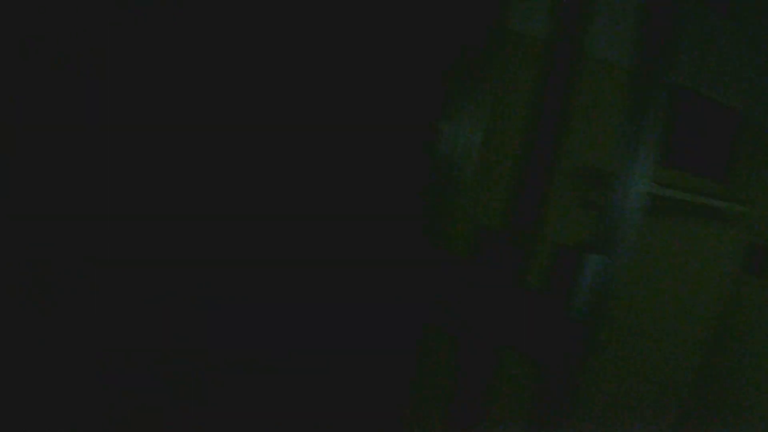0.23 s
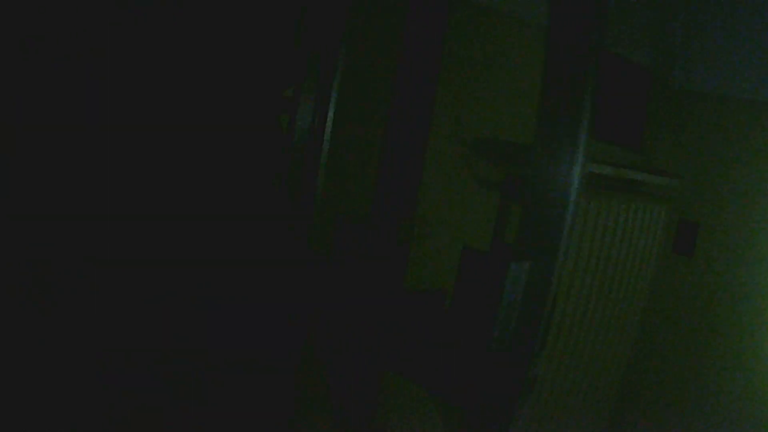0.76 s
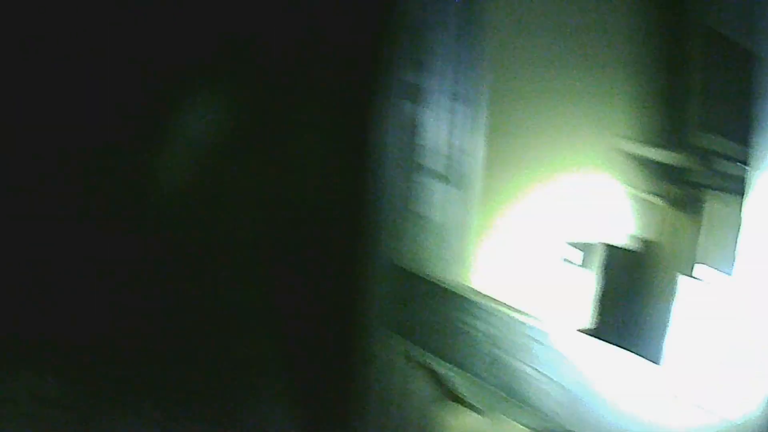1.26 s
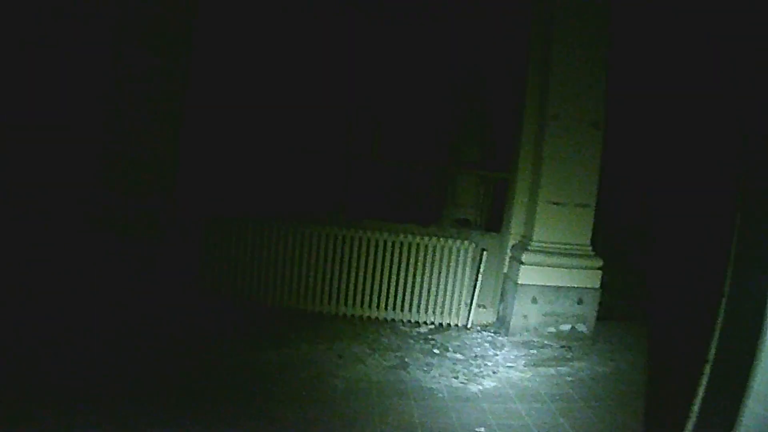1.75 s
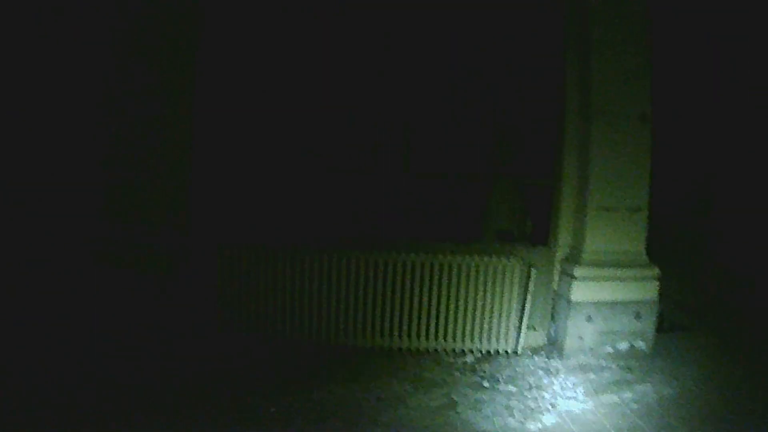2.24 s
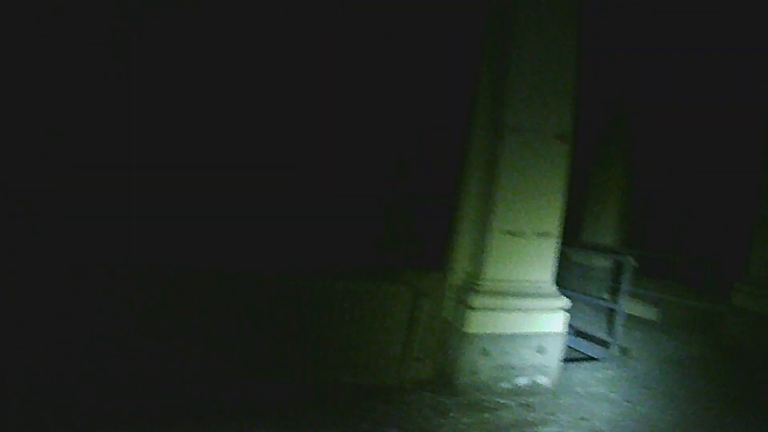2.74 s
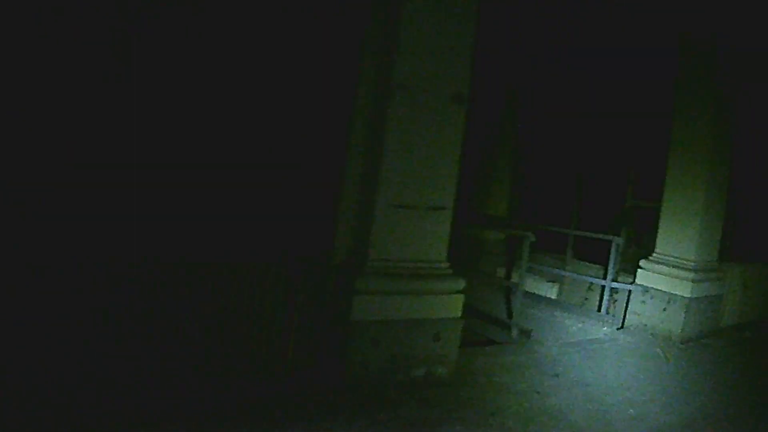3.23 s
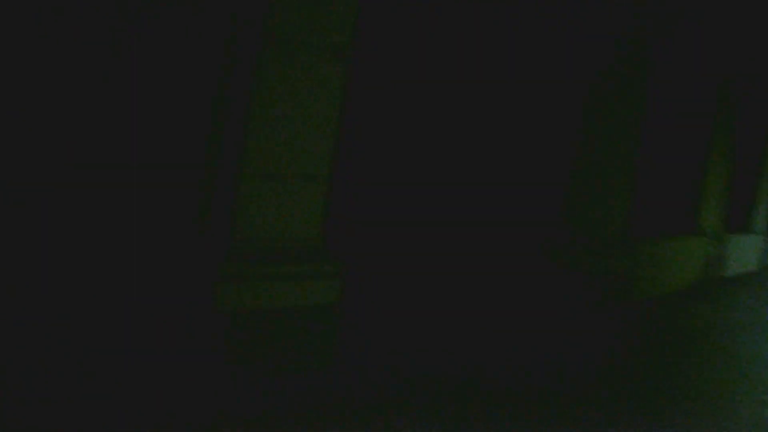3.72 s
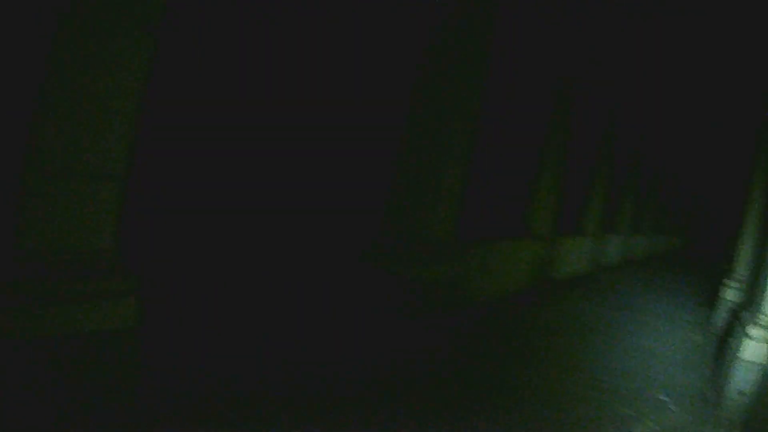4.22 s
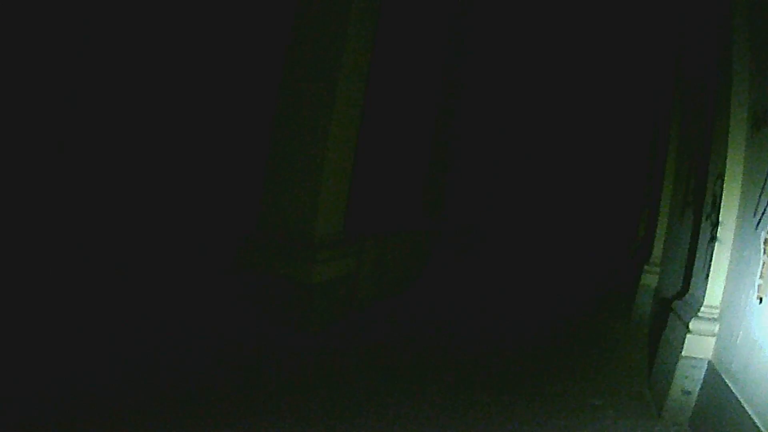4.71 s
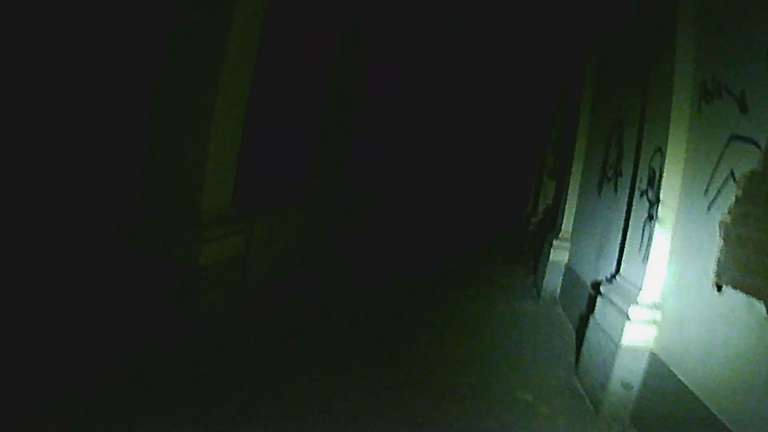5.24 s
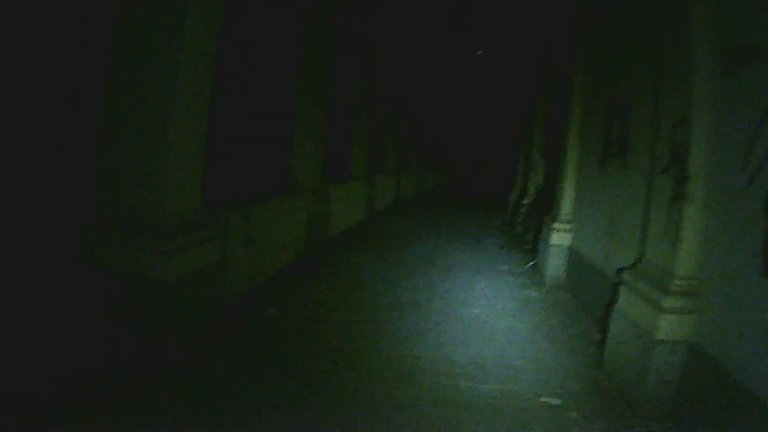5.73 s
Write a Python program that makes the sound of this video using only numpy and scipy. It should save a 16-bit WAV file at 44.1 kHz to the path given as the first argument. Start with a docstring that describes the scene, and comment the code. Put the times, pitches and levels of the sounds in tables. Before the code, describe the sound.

Close, handheld pickup of a careful walk through a dark, bare building. Fragments break underfoot with dry, ceramic clacks, coarse grains grind beneath soles and low heel thumps land softly. A loud bright break comes about two seconds in, followed by dense crackling. After four seconds the steps quieten into fine grit and small shard squeaks, with a very faint high pulsing whine. The hall rings after each step over hiss and rumble.

```python
"""Footsteps over broken tile and plaster in a large, empty stone hall, with air hiss and an uneven rumble.
From the start, struck resonances snap as fragments break, clumped grains grind and shoes thump.
Shards squeal in wavering tones from 0.4 s; decaying sine modes colour the loud break at 2.1 s.
A thin whine of two gated tones pulses from 4.3 to 5.1 s, and the grit turns finer at 4.6 s.
Decaying noise bands make the hall ring for about a second after the steps, snaps, grit and shards."""
import sys
import numpy as np
from scipy import signal
from scipy.fft import rfft, irfft, next_fast_len
from scipy.io import wavfile
from scipy.ndimage import uniform_filter1d

SR = 44100
rng = np.random.default_rng(int(sys.argv[2]) if len(sys.argv) > 2 else 0)


def persist_wave(psi):
    """Save psi, clipped to +-1, as 16-bit WAV."""
    counts = np.round(np.clip(psi, -1, 1) * 32767).astype(np.int16)
    wavfile.write(sys.argv[1], SR, np.atleast_2d(counts).T)


N = 263277
TIME = np.arange(N) / SR

# The clearest snaps: breaking fragments and, after the snap at 1.36 s, likely wall echoes.
# Level is nominal, treble is relative to the body.
# Columns: start_s, level_db, treble_db, body_hz, edge_hz
CLEAR_SNAPS = [(.001, -32.5, -6.5, 1120, 3160), (.0832, -36.5, -27, 1520, 3380),
               (.355, -35.5, -7.5, 1000, 3400), (.3933, -35, -23, 1570, 4050),
               (.5832, -28, -30, 1360, 2530), (.5917, -32.5, -35, 1360, 2530),
               (.6193, -20.5, -35, 1400, 2730), (.691, -37, 3, 1600, 3700), (1.091, -47, 4, 1480, 3520),
               (1.2688, -50, 9, 1400, 3730), (1.357, -21, -2, 1290, 3630), (1.4832, -38.5, 5, 1530, 2250),
               (1.5658, -38.5, -32, 1490, 2680), (2.093, -25.5, 20, 1070, 3200),
               (2.1094, -21, 1, 1100, 2170), (2.161, -34, -6, 1620, 2380), (2.6433, -39.5, -28, 1380, 4520),
               (2.6762, -41.5, -12, 1510, 3747), (2.7182, -30, -13, 1100, 3420),
               (2.721, -34, 3, 1430, 3700), (2.725, -38, -15, 1100, 3980), (2.783, -37, -5, 1450, 4190),
               (2.812, -35, -18, 1550, 2940), (2.851, -27, -7.5, 1500, 3600), (3.101, -44, 14, 1380, 3600),
               (3.177, -38, -3, 950, 3750), (3.2902, -33.5, -8, 1410, 2400), (3.3467, -30, -5, 1190, 3300),
               (3.3688, -34, 24, 1270, 3800), (3.3923, -36.5, -20, 1220, 3820),
               (3.5223, -38, -6, 1150, 3200), (3.5774, -41.5, -29, 1550, 3000),
               (3.6002, -41, -9, 1350, 3060), (3.7729, -39.5, -30, 1460, 2360),
               (3.8076, -37.5, -17, 1340, 2920), (3.8562, -35.5, -10.5, 1290, 2880),
               (3.8758, -40, -27, 1320, 3140), (3.9203, -30.5, -21, 1520, 2520),
               (3.9329, -36.5, -6, 1240, 3550), (4.0137, -41, 17, 1320, 3430), (4.023, -32, -8, 1490, 3700),
               (4.3431, -46.5, -12, 1660, 3550), (4.5181, -49, -4, 1300, 4260),
               (5.6234, -47.5, -14, 1590, 2590)]
# Splintering relative to the first break [dB]; brighter breaks splinter more [dB per dB of treble].
SPLINTER_DB, SPLINTER_PER_TREBLE = -3, 0.17

# Random faint snaps around each step, mostly shortly after it: count, mean delay and its spread [s].
CRUMBS_PER_STEP, CRUMB_LAG_S, CRUMB_SPREAD_S = 4, 0.08, 0.09
# Mean level, treble and resonances, then the spread of each.
CRUMB_DB, CRUMB_TREBLE_DB, CRUMB_HZ, CRUMB_EDGE_HZ = -52.5, -13, 1440, 3100
CRUMB_SPREAD_DB, CRUMB_TREBLE_SPREAD_DB, CRUMB_SPREAD_OCT = 6.5, 5.5, 0.13

# A sole grinding grit; level holds before the pressure curve, whose sides have 1/e times rise and fall.
# Columns: peak_s, rise_s, fall_s, level_db, tilt_db_per_octave
GRINDING_SOLES = [(.004, .013, 0.1, -43.5, -1.5), (.37, 0.016, 0.36, -55.5, 0),
                  (0.59, .018, 0.023, -37, -3), (.645, .032, 0.075, -42.5, -3),
                  (2.094, 0.0059, 0.0068, -32, -2), (2.117, .006, .02, -31.5, 0),
                  (2.551, 0.034, 0.35, -57.5, -.5), (2.724, 0.0095, 0.015, -32, -2),
                  (2.787, .0038, 0.0051, -35.5, 4), (2.835, .022, 0.02, -40, 1.5),
                  (3.348, 0.024, 0.022, -39.5, 2), (3.44, 0.023, .053, -48.5, 0.5),
                  (3.933, .05, 0.11, -49.5, -3), (4.03, 0.029, 0.074, -48, 0), (4.36, .019, 0.05, -58, -1),
                  (4.53, 0.043, 0.13, -59.5, -1), (4.65, 0.023, 0.18, -52, -5),
                  (5.07, 0.026, 0.082, -45.5, 2), (5.16, .069, 0.2, -51, 0),
                  (5.34, 0.023, 0.062, -52, -1.5), (5.743, 0.045, 0.079, -57, 0),
                  (5.891, 0.078, 0.041, -57.5, 5.5)]
# Ring of grit pinned under a sole, relative spectrum before tilt. Columns: pitch_hz, level_db_per_hz
GRIT_SPECTRUM = [(350, -8.5), (600, -13), (900, -1.5), (1400, -1), (1750, -7.5), (2200, -6), (3000, -13),
                 (4100, -8), (5300, -20), (6900, -15), (8500, -27), (10000, -31), (12000, -25.5),
                 (14500, -40.5)]
# Coarse rubble gives way to fine dust further along the floor.
COARSE_GRAINS_PER_S, FINE_GRAINS_PER_S, DUST_FROM_S = 3000, 14000, 4.6

# The shoe's weight landing, nominal levels. Columns: start_s, heel_level_db, sole_level_db, sole_hz
FOOTFALLS = [(.002, -55, -46, 452), (.547, -47, -58, 500), (1.359, -49, -46.5, 510),
             (2.088, -45, -41.5, 493), (2.717, -46, -42.5, 790), (3.346, -49.5, -49, 380),
             (4.036, -58, -45.5, 666), (4.561, -55.5, -59, 785), (5.039, -45.5, -46, 476),
             (5.312, -61.5, -40.5, 786), (5.708, -56.5, -58, 590)]
HEEL_HZ, HEEL_FALL_S, SOLE_FALL_S = 142.4, 0.08, 0.045

# Shards skidding on tile, nominal levels; the swell peaks at a quarter of its time scale.
# Columns: start_s, time_scale_s, pitch_hz, level_db
SKIDDING_SHARDS = [(0.396, 0.025, 1910, -49), (0.688, 0.0037, 4380, -35), (0.72, 0.0051, 4620, -51),
                   (2.519, 0.016, 6060, -56), (3.539, 0.031, 12400, -68), (4.109, 0.026, 4590, -59),
                   (4.098, 0.018, 7270, -57.5), (4.09, 0.016, 6260, -55), (5.323, 0.14, 1229, -49.5),
                   (5.626, 0.075, 4500, -59.5), (5.633, 0.052, 5990, -60.5), (5.641, 0.02, 8760, -66),
                   (5.725, 0.012, 11250, -66), (5.822, 0.046, 2670, -53.5)]

BREAK_RING_S = 2.1094
# Short pitched ring that colours the loud break at 2.1 s. Columns: pitch_hz, t60_s, peak_level_db
BREAK_RING_MODES = [(1649, .06, -40), (2309, .07, -35), (2380, .05, -37), (2584, .04, -42),
                    (2984, .04, -42), (3481, .05, -43), (3893, .06, -45)]

# Reverberation of the hall; reflected over direct energy, before the level sent to the hall.
# Columns: centre_hz, t60_s, reflected_db
HALL_BANDS = [(79.5, 0.83, 5), (188, 0.91, 0), (610, 1.68, 0), (1060, 0.94, -3.5), (1446, 1.11, 1.5),
              (2000, 0.93, -1), (2800, 0.72, -0.5), (3980, 0.9, 0), (6500, 0.53, 0), (11900, 0.44, 5)]

# Uneven low rumble, before RUMBLE_GAIN_DB; the swell at 5.1 s belongs to a heel thump.
# Columns: time_s, level_db
RUMBLE_LEVEL = [(0.0, -51.5), (0.38, -60), (0.53, -52.5), (2.03, -63.5), (2.23, -50), (2.33, -62),
                (2.63, -43.5), (3.16, -58.5), (3.46, -47.5), (3.92, -57), (4.12, -45), (4.32, -62.5),
                (4.72, -51), (4.89, -70), (5.1, -42), (5.44, -64), (5.87, -47.5), (5.97, -53)]
# Relative spectrum of that rumble. Columns: frequency_hz, level_db_per_hz
RUMBLE_SPECTRUM = [(8, 0), (15, 2.5), (28, -0.5), (50, -11), (80, -26), (160, -50), (400, -68)]
RUMBLE_GAIN_DB = 5

# Relative spectrum of still air and microphone hiss. Columns: frequency_hz, level_db_per_hz
HISS_SPECTRUM = [(60, 3), (150, -1.5), (300, -7), (700, -13), (1400, -9), (3000, -17), (7000, -22),
                 (14500, -25.5)]
HISS_DB = -61
CUTOFF_HZ = 14700


def cracks(splinter_s=0.0031, body_width_hz=600, body_db=-1.5, edge_db=-0.98, thump_db=-14,
           fracture_hz=2700, fracture_db=-7, chip_hz=7000, chip_db=-11, dust_hz=11800, dust_db=-29):
    """Impulse response: a sharp break and a little splintering excite damped body and edge resonances."""
    out, t = np.zeros(N), TIME[:SR // 40]
    for start_s, level_db, treble_db, body_hz, edge_hz in list(CLEAR_SNAPS) + crumbs():
        splinter_db = SPLINTER_DB + SPLINTER_PER_TREBLE * treble_db
        splinter_swell = t / splinter_s * np.exp(-2 * t / splinter_s)
        splinters = rng.standard_normal(len(t)) * splinter_swell
        force = from_db(splinter_db) * splinters / np.linalg.norm(splinters)
        force[0] = 1  # the first break

        body = resonate(resonate(force, body_hz, body_width_hz), body_hz, 820)
        body += from_db(thump_db) * lowpass(resonate(force, 570, 640), 640)

        ring = resonate(resonate(force, edge_hz, edge_hz / 2), edge_hz, edge_hz)
        fracture = from_db(fracture_db) * resonate(resonate(force, fracture_hz, 1600), fracture_hz, 2300)
        chip = from_db(chip_db) * resonate(force, chip_hz, 1670)
        # neighbouring modes swing in opposite senses
        edge = lowpass(ring - fracture - chip, 6900)
        edge += from_db(dust_db) * resonate(force, dust_hz, 2300)
        # a gentle break is less sharp
        edge = lowpass(edge, np.interp(level_db, [-40, -22], [4500, 14000]))

        edge_share = 1 / (1 + from_db(-treble_db) ** 2)  # share of energy
        snap = from_db(body_db) * np.sqrt(1 - edge_share) * rms_one(body)
        snap += from_db(edge_db) * np.sqrt(edge_share) * rms_one(edge)
        # refer the energy to a nominal snap of 2.4 ms
        add(out, start_s, from_db(level_db) * snap * np.sqrt(0.0024 / t[-1]))
    return out


def crumbs():
    """Size scaling: faint snaps scattered around each step, where a smaller crumb rings higher."""
    steps_s = np.repeat(np.array(FOOTFALLS)[:, 0], int(round(CRUMBS_PER_STEP)))
    when, level, treble, smallness = rng.standard_normal((len(steps_s), 4)).T
    pitch = 2 ** (CRUMB_SPREAD_OCT * smallness)
    rows = np.transpose([
        steps_s + CRUMB_LAG_S + CRUMB_SPREAD_S * when,
        CRUMB_DB + CRUMB_SPREAD_DB * level,
        CRUMB_TREBLE_DB + CRUMB_TREBLE_SPREAD_DB * treble,
        CRUMB_HZ * pitch,
        CRUMB_EDGE_HZ * pitch,
    ])
    return [row for row in rows if 0 < row[0] < TIME[-1]]


def grit(size_db=2.5, relative_width=0.27, clump_db=3.0, count=26):
    """Granular friction: random grain bursts, clumped in level, each ring a brief resonance."""
    out, t = np.zeros(N), TIME[:SR // 2]
    pitches = np.geomspace(350, 14000, count)
    for peak_s, rise_s, fall_s, level_db, tilt_db in GRINDING_SOLES:
        grains_per_s = COARSE_GRAINS_PER_S if peak_s < DUST_FROM_S else FINE_GRAINS_PER_S
        start_s = max(0, peak_s - 2 * rise_s)
        from_peak = t + start_s - peak_s
        pressure = np.exp(-(from_peak / np.where(t + start_s < peak_s, rise_s, fall_s)) ** 2)
        clumps = from_db(clump_db * wander(len(t), SR // 250))
        tilt = tilt_db * np.log2(np.clip(pitches, 900, 6000))
        # the root turns level per Hz into level per resonance
        gains = from_db(at_hz(GRIT_SPECTRUM, pitches) + tilt) * np.sqrt(pitches)
        crunch = 0
        for hz, gain in zip(pitches, gains):
            sizes = from_db(size_db * np.minimum(rng.exponential(1, len(t)), 3))
            sizes = sizes * rng.choice([-1, 1], len(t))
            struck = rng.random(len(t)) < grains_per_s / count / SR
            bursts = sizes * clumps * struck
            width_hz = relative_width * np.sqrt(hz * 2000)
            crunch = crunch + gain * rms_one(resonate(resonate(bursts, hz, width_hz), hz, width_hz))
        add(out, start_s, from_db(level_db) * rms_one(crunch) * pressure)
    return out


def thuds(relative_width=1.19, rise_s=0.00064):
    """Damped impact: each step gives two short noise bursts, a low heel thump and a soft sole slap."""
    out, t = np.zeros(N), TIME[:SR // 3]
    for start_s, heel_db, sole_db, sole_hz in FOOTFALLS:
        for level_db, hz, fall_s in (heel_db, HEEL_HZ, HEEL_FALL_S), (sole_db, sole_hz, SOLE_FALL_S):
            width_hz = hz * relative_width
            push = resonate(resonate(rng.standard_normal(len(t)), hz, width_hz), hz, width_hz)
            swell = (1 - np.exp(-t / rise_s)) * np.exp(-t / fall_s)
            add(out, start_s, from_db(level_db) * rms_one(push * swell) * np.std(swell))
    return out


def squeals(jitter=0.029, sag_per_s=0.068, rough_db=6):
    """Stick-slip friction: a dragged shard sings a wavering, rough tone that sinks a little in pitch."""
    out, t = np.zeros(N), TIME[:SR // 4]
    for start_s, time_scale_s, hz, level_db in SKIDDING_SHARDS:
        pitch_hz = hz * (1 - sag_per_s * t + jitter * wander(len(t), SR // 500))
        roughness = from_db(rough_db * wander(len(t), SR // 150))
        tone = np.sin(2 * np.pi * np.cumsum(pitch_hz) / SR) * roughness
        swell = np.sqrt(t / time_scale_s) * np.exp(1 - 2 * t / time_scale_s)
        add(out, start_s, from_db(level_db) * rms_one(tone * swell) * np.sqrt(np.mean(swell ** 2)))
    return out


def break_ring():
    """Modal decay: exponentially decaying sine modes give the loud break a short pitched ring."""
    out, t = np.zeros(N), TIME[:SR // 3]
    for hz, t60_s, level_db in BREAK_RING_MODES:
        decay = np.exp(-np.log(1000) * t / t60_s)
        mode = np.sin(2 * np.pi * (hz * t + rng.random()))
        add(out, BREAK_RING_S, from_db(level_db) * decay * mode)
    return out


def hall(x, build_s=0.0057, early_db=3, early_s=0.041, lumpy_db=0.5):
    """Reverberation: convolution with noise that builds quickly, then decays at its own rate in each band."""
    t = TIME[:2 * SR]
    hz = np.fft.rfftfreq(len(t), 1 / SR)
    lumps = from_db(lumpy_db * rng.standard_normal(len(t)))
    reflections = rfft(rng.standard_normal(len(t)) * lumps)
    # near walls answer first, a little stronger
    onset = (1 - np.exp(-(t / build_s) ** 2)) * from_db(early_db * np.exp(-t / early_s))
    response = np.zeros(len(t))
    for centre_hz in 62.5 * 2 ** np.arange(0, 8.6, 0.5):
        # triangular bands half an octave apart
        band = np.maximum(0, 1 - 2 * np.abs(np.log2((hz + 1e-9) / centre_hz)))
        decay = onset * from_db(-60 * t / at_hz(HALL_BANDS, centre_hz))
        decay *= from_db(at_hz(HALL_BANDS, centre_hz, axis=2)) / np.sqrt(np.sum(decay ** 2))
        response += irfft(reflections * band) * decay
    return signal.fftconvolve(x, response / np.std(irfft(reflections)))[:N]


def whine(pitch_hz=7800, upper_hz=9109, level_db=-77, upper_db=-7):
    """Amplitude gating: two faint, high sine tones pulse on and off with softened edges."""
    start_s, end_s, period_s = 4.31, 5.06, 0.0688
    first_half = (TIME - start_s) / period_s % 1 < 0.5
    on = (TIME > start_s) & (TIME < end_s) & first_half
    tone = np.sin(2 * np.pi * pitch_hz * TIME)
    tone += from_db(upper_db) * np.sin(2 * np.pi * upper_hz * TIME)
    # the root of two brings the lower tone to rms 1
    return from_db(level_db) * np.sqrt(2) * tone * uniform_filter1d(on * 1.0, SR // 150)


def uneven_rumble():
    """Amplitude modulation: low noise swells and sinks along a level curve."""
    level_db = np.interp(TIME, *np.transpose(RUMBLE_LEVEL))
    return from_db(level_db + RUMBLE_GAIN_DB) * coloured_noise(RUMBLE_SPECTRUM)


def air_hiss():
    """Stationary random noise: still air and microphone hiss share one steady spectrum."""
    return from_db(HISS_DB) * coloured_noise(HISS_SPECTRUM)


def from_db(db):
    """Decibel law: level to amplitude ratio."""
    return 10 ** (np.asarray(db) / 20)


def rms_one(x):
    """Normalisation to unit rms."""
    return x / np.sqrt(np.mean(x ** 2) + 1e-20)


def at_hz(points, hz, axis=1):
    """Linear interpolation of a table column on a log-frequency axis."""
    points = np.array(points)
    return np.interp(np.log(hz + 1e-9), np.log(points[:, 0]), points[:, axis])


def coloured_noise(spectrum):
    """Spectral shaping: white noise filtered to the given spectrum; rms 1."""
    size = next_fast_len(N)
    hz = np.fft.rfftfreq(size, 1 / SR)
    white = rfft(rng.standard_normal(size))
    return rms_one(irfft(white * from_db(at_hz(spectrum, hz)), size)[:N])


def wander(length, size):
    """Smoothed random motion that changes over about size samples; rms 1."""
    return rms_one(uniform_filter1d(rng.standard_normal(length), size, mode="wrap"))


def resonate(x, hz, width_hz):
    """Damped resonance: a two-pole filter with about unit gain at its peak."""
    r = np.exp(-np.pi * width_hz / SR)
    zeros = np.array([1, 0, -1]) * (1 - r * r) / 2
    poles = [1, -2 * r * np.cos(2 * np.pi * hz / SR), r * r]
    return signal.lfilter(zeros, poles, x + 1e-18)


def lowpass(x, hz):
    """Second-order Butterworth attenuation above hz."""
    return signal.sosfilt(signal.butter(2, min(hz, 0.45 * SR), fs=SR, output="sos"), x)


def add(out, start_s, sound):
    """Superposition: lays a sound into the track at its start time."""
    start = max(0, int(start_s * SR))
    out[start:start + len(sound)] += sound[:N - start]


def scene():
    """Superposition of direct sounds, their reverberation and the background."""
    snaps, crunch, weight = cracks(), grit(), thuds()
    tones = squeals() + break_ring()
    to_hall = from_db(-2.5) * snaps + from_db(-5.0) * crunch
    to_hall += from_db(-3.0) * weight + from_db(-3.0) * tones
    direct = snaps + crunch + weight + tones
    background = whine() + uneven_rumble() + air_hiss()
    return (direct + hall(to_hall) + background)[None]


def record(dry):
    """Band limitation: a steep elliptic low-pass cuts the top."""
    return signal.sosfilt(signal.ellip(10, 0.1, 80, CUTOFF_HZ, fs=SR, output="sos"), dry)


dry = scene()
out = record(dry)
persist_wave(out)
```